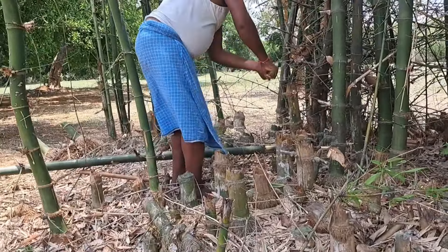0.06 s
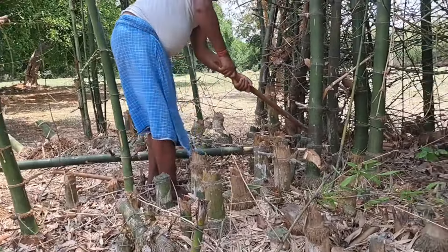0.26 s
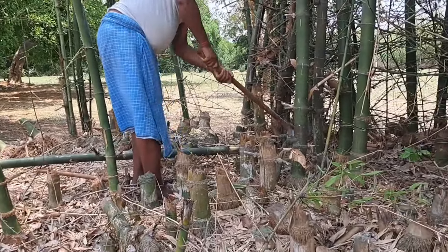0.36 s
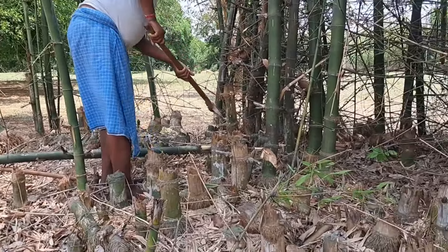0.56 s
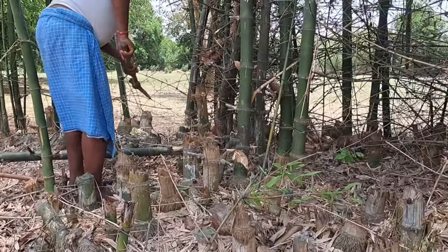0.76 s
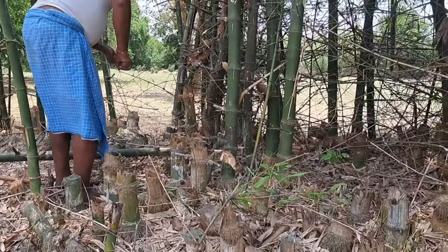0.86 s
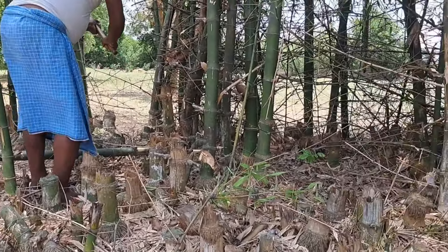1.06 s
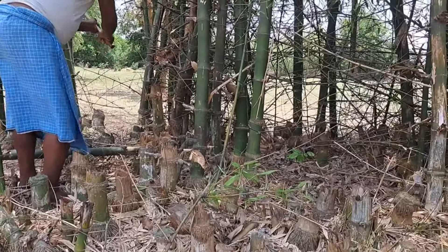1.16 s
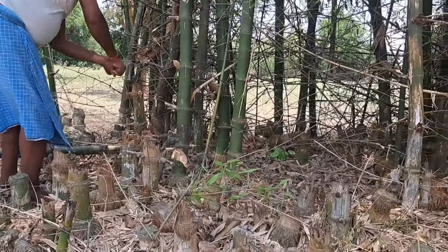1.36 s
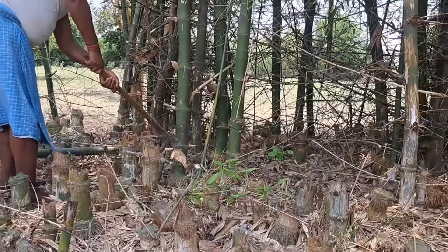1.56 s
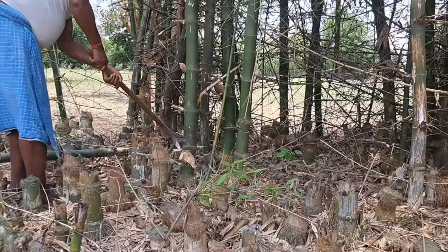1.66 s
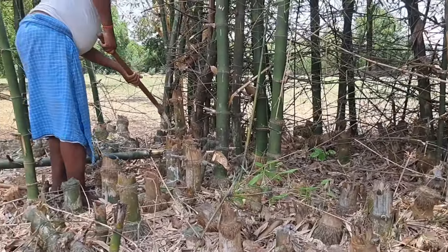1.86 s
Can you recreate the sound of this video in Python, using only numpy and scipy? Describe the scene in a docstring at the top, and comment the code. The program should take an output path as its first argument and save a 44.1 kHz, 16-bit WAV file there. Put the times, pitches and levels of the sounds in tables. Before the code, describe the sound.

A blade chops into green bamboo at about 0.2 seconds, slightly to the right, with a sharp crack, a brief hollow ring and a short outdoor echo. Dry leaves rustle and twigs snap just after. Near 1.4 seconds another swing brushes through twigs, and a second chop lands at 1.5 with a dull thud. Faint insect hiss and low wind continue throughout, with small microphone bumps in the first second.

```python
"""Chopping green bamboo

A long-handled blade chops twice into bamboo in a grove, a few metres right of a hand-held microphone.
Each swing brushes through twigs and fractures fibres with a crack; the impact excites the modes of
the hollow stalk, shakes dry leaves and is scattered back by the grove.
Wind and small bumps touch the microphone; insects hiss far away."""
import sys
import numpy as np
from scipy import signal
from scipy.fft import rfft, irfft
from scipy.io import wavfile
from scipy.ndimage import uniform_filter1d

SR = 44100
rng = np.random.default_rng(int(sys.argv[2]) if len(sys.argv) > 2 else 0)


def transcribe(u):
    """Save the signal u as a 16-bit wav file named by the first command-line argument.

    u: samples, shape (n,) or (channels, n), limited to [-1, 1]; the rate is SR.
    q: integer samples, one column per channel.
    """
    v = np.clip(np.atleast_2d(u).T, -1, 1)
    q = np.round(v * 32767).astype(np.int16)
    wavfile.write(sys.argv[1], SR, q)


N = 83790
T, HZ = np.arange(N) / SR, np.maximum(np.fft.rfftfreq(N, 1 / SR), 1)
T60_PER_DECAY = np.log(1000)  # time constants in a fall of 60 dB


def undb(db):
    """Amplitude ratio of a level in decibels."""
    return 10 ** (np.asarray(db) / 20)


def unit(x):
    """Normalisation to rms 1."""
    return x / np.sqrt(np.mean(x ** 2, axis=-1, keepdims=True))


def across(table, column=1):
    """Interpolation of a table column over log frequency."""
    table = np.array(table, float)
    return np.interp(np.log(HZ), np.log(table[:, 0]), table[:, column])


def hump(hz, octaves):
    """Magnitude response of a broad resonance."""
    return 1 / (1 + (np.log2(HZ / hz) / octaves) ** 2 / 2) ** 2


def patchy(depth_db=3.5, spacing_hz=70):
    """Irregular response of many narrow resonances of stalks and twigs."""
    grid = np.arange(0, SR / 2, spacing_hz)
    return undb(depth_db * np.interp(HZ, grid, rng.standard_normal(len(grid))))


def colour(x, gain):
    """Minimum-phase filtering by way of the folded cepstrum."""
    cepstrum = irfft(np.log(gain + 1e-6), N)
    fold = 1 + np.sign(N / 2 - np.arange(N)) - (T == 0)
    return irfft(rfft(x) * np.exp(rfft(cepstrum * fold)), N)


def noise():
    """Two uncorrelated channels of white noise."""
    return rng.standard_normal((2, N))


def crackle(per_s, spread_db):
    """Shot noise: a Poisson train of tiny fractures of uneven size."""
    size = (rng.random(N) < per_s / SR) * undb(spread_db * rng.exponential(size=N).clip(0, 4))
    power = uniform_filter1d(size ** 2, size=8).clip(0)
    return unit(noise() * np.sqrt(power))


def burst(start, rise_s, decay_s, hold_s=0):
    """Envelope of linear attack, hold and exponential decay."""
    age = T - start
    return np.clip(age / rise_s, 0, 1) * np.exp(-np.maximum(age - rise_s - hold_s, 0) / decay_s)


def at_level(x, envelope):
    """Normalisation to the rms of an envelope."""
    return unit(x) * np.sqrt(np.mean(envelope ** 2))


def excite(source, envelope, gain):
    """Source-filter model: a shaped excitation drives a resonant body."""
    return at_level(colour(source * envelope, gain), envelope)


# stereo image: frequency_hz, left_minus_right_db, coherence
IMAGE = [(100, -4.5, 1), (500, -5, 0.6), (989, -3.5, 0.48), (1670, -5.5, 0.1), (3100, -12, .1),
         (5500, -6.5, .05), (9100, -0.5, 0.11), (15000, -0.5, 0.033)]


def place(pair, left_lead_s=.00007):
    """A level difference puts the source to the right; coherence falls towards the treble."""
    pan_db = across(IMAGE)
    angle = np.arccos(across(IMAGE, column=2).clip(-1, 1))
    right, diffuse = rfft(pair)
    left = (right * np.cos(angle) + diffuse * np.sin(angle)) * np.exp(2j * np.pi * HZ * left_lead_s)
    return irfft(np.array([left * undb(pan_db / 2), right * undb(-pan_db / 2)]), N)


# spectrum of distant insects and leaves: frequency_hz, gain_db
INSECT_SPECTRUM = [(100, 5.5), (200, -5.5), (320, -6.5), (600, -20.5), (1100, -15), (1650, -19.5),
                   (2200, -11), (3130, -8.5), (4120, -15.5), (4950, -4), (5940, -8.5), (8270, -28.5),
                   (11700, -21.5), (16000, -30)]


def insects(level_db=-52):
    """Many distant sources sum incoherently to a gently swelling hiss."""
    swell_db = .7 * unit(colour(noise()[0], hump(4, 1)))
    return undb(level_db + swell_db) * unit(colour(noise(), undb(across(INSECT_SPECTRUM))))


# wind strength at the microphone: time_s, level_db
WIND_LEVELS = [(0, -46), (.4, -53), (.55, -52.5), (.7, -50.5), (.81, -60.5), (1.0, -45.5), (1.22, -43.5),
               (1.33, -49.5), (1.42, -43), (1.5, -39.5), (1.7, -47), (1.9, -48.5)]


def wind():
    """Turbulent pressure makes a gusty rumble, uncorrelated at the two ports."""
    gust_db = 3 * unit(colour(noise(), hump(18, .98)))
    rumble = unit(colour(noise(), hump(66, 1.66) ** 4))
    level_db = np.interp(T, *np.array(WIND_LEVELS).T)
    return rumble * undb(level_db + gust_db) * undb([[1.5], [-1.5]])


# touches on the microphone: start_s, level_db, pitch_hz, decay_s, tick_relative_db
MIC_BUMPS = [(0.0095, -19.5, 232, 0.0027, -20), (0.033, -29, 290, 0.00093, -19),
             (0.054, -16, 143, 0.0061, -21), (0.099, -22, 163, 0.0014, -15),
             (0.158, -34.5, 175, 0.013, -20), (0.5335, -9, 316, 0.00038, -9),
             (0.9731, -26, 200, 0.00055, -2), (0.997, -27, 198, 0.0011, -2.5),
             (1.0438, -25, 290, 0.0037, -2), (1.05, -28, 111.3, 0.026, -4.5)]


def bumps(rise_cycles=.55):
    """Contact noise: damped knocks with a small tick, almost only at the right port."""
    knocks, ticks = 0, 0
    for start, db, hz, decay, tick_db in MIC_BUMPS:
        knocks -= undb(db) * np.sin(2 * np.pi * hz * (T - start)) * burst(start, rise_cycles / hz, decay)
        tick = excite(noise()[0], burst(start, .000095, .00035), hump(850, 2.3) ** 4)
        ticks += undb(db + tick_db) * tick
    return (colour(knocks, hump(200, 1.3)) + ticks) * undb([[-24], [0]])


# spectrum of dry leaves and twigs: frequency_hz, gain_db
LEAF_SPECTRUM = [(100, -8), (500, -9), (1200, -8.5), (1900, -4), (3100, 3.5), (4200, -4.5), (6300, 1.5),
                 (8500, -14), (10000, -14.5), (12000, -11)]


def rustle(envelope, per_s, spread_db, tilt_db=0):
    """Dense random impulses excite the resonances of dry foliage."""
    gain = undb(across(LEAF_SPECTRUM) + tilt_db * np.log2(HZ / HZ[-1]))
    return excite(crackle(per_s, spread_db), envelope, gain * patchy())


# brushes against twigs: start_s, level_db, rise_s, decay_s, tilt_db_per_octave
TWIG_BRUSHES = [(0.143, -30.5, 0.0094, 0.023, 1), (0.176, -35.5, 0.0025, 0.026, -1),
                (0.207, -38.5, 0.019, 0.06, -3.5), (0.301, -26.5, 0.0049, 0.011, 3.5),
                (0.329, -34, 0.0022, 0.015, 2.5), (0.431, -38.5, 0.0029, 0.017, 1),
                (0.554, -43.5, 0.015, 0.032, -2), (0.724, -44, 0.012, 0.046, 0),
                (1.439, -20.5, 0.004, 0.012, 9), (1.563, -27, 0.0024, 0.026, 4)]
# twig snaps, and near 1 s a tick and a short scrape from touches on the microphone:
# start_s, level_db, centre_hz, width_octaves, decay_s
CLICKS = [(0.2998, -32, 5740, 0.36, .004), (0.3084, -24, 3100, 0.28, 0.0041),
          (0.3871, -24.5, 4520, 0.4, 0.0064), (0.7313, -34.5, 3100, 0.22, 0.0039),
          (0.847, -46.5, 3300, 0.18, 0.0059), (0.974, -25.5, 3270, 0.56, 0.00029),
          (1.0435, -40, 1720, 1.0, 0.0025), (1.441, -38.5, 1250, 0.069, 0.011)]
# blade passing through foliage: peak_s, level_db, rise_s, fall_s, centre_hz, width_octaves
BLADE_SWEEPS = [(1.481, -42.5, 0.076, 0.23, 3150, 0.31), (1.483, -44, 0.046, 0.17, 1600, 2.46),
                (1.505, -49.5, 0.068, 0.018, 448, 0.8)]


def foliage_and_clicks():
    """Friction and fracture: foliage is brushed, snapped and swept; microphone touches tick and scrape."""
    out = 0
    for start, db, rise, decay, tilt_db in TWIG_BRUSHES:
        out += undb(db) * rustle(burst(start, rise, decay), per_s=7000, spread_db=2.4, tilt_db=tilt_db)
    for start, db, hz, width, decay in CLICKS:
        out += undb(db) * excite(noise(), burst(start, .00028, decay), hump(hz, width) * patchy())
    for peak, db, rise, fall, hz, width in BLADE_SWEEPS:
        swell = np.exp(-((T - peak) / np.where(T < peak, rise, fall)) ** 2 / 2)
        out += undb(db) * excite(crackle(per_s=4000, spread_db=.92), swell, hump(hz, width))
    return out


def far_echo(start):
    """Diffuse reflection from distant trees builds up late."""
    return excite(noise(), burst(start, rise_s=.078, decay_s=.13), hump(1000, 1.49) ** 2 * patchy())


# reverberation of the grove: frequency_hz, gain_db, t60_s
GROVE_BANDS = [(108, 0, 0.27), (246, 2, 0.54), (500, 7.5, 0.26), (1110, 6, 0.34), (1850, 0, 0.51),
               (3100, -8, 0.65), (6900, -13, 0.93), (8600, -25, 0.71), (15800, -21.5, 0.83)]


def grove_echo(start):
    """Multiple scattering among stalks leaves a noise tail; the treble lingers longest."""
    spectrum = rfft(unit(colour(noise(), undb(across(GROVE_BANDS)) * patchy())))
    out = 0
    for centre, _, t60 in GROVE_BANDS:
        band = across([(hz, hz == centre) for hz, *_ in GROVE_BANDS])
        out += irfft(spectrum * band, N) * burst(start, .013, t60 / T60_PER_DECAY)
    return out


# thuds of the shaken clump: start_s, level_db, hold_s, decay_s
CLUMP_THUDS = [(0.244, -31, 0.029, 0.019), (1.542, -21.5, 0.0041, 0.01), (1.601, -31, .04, .01)]


def thuds():
    """Heavily damped vibration of the clump and the ground gives dull rumbles."""
    out = 0
    for start, db, hold, decay in CLUMP_THUDS:
        envelope = burst(start, .007, decay, hold)
        rumble = colour(noise(), hump(78, 1.05) ** 2)
        out += undb(db) * at_level(rumble * envelope, envelope)
    return out


# modes of the hard stalk wall: pitch_hz, t60_s, first_chop_db, second_chop_db
WALL_MODES = [(1620, .024, -13, -26), (2456, .028, -7.5, -24), (3245, .028, -16, -18),
              (3700, .024, -13, -26), (6030, .03, -21, -21)]


def wall_ring(start, chop):
    """Impulse response: the landing edge sets the wall into brief free vibration."""
    out = 0
    for hz, t60, *levels_db in WALL_MODES:
        envelope = burst(start, .0005, t60 / T60_PER_DECAY)
        out += undb(levels_db[chop]) * envelope * np.sin(2 * np.pi * hz * (T - start))
    return np.sqrt(2) * out


# modes of the hollow stalk: pitch_hz, t60_s, swell_s, first_chop_db, second_chop_db
STALK_MODES = [(153, .3, .012, -35, -33), (246, .16, .012, -26.5, -31), (293, .3, .025, -32, -30),
               (402, .13, .026, -27, -34), (457, .11, .024, -26, -29), (546, .18, .028, -22, -35),
               (572, .18, .031, -29, -24), (725, .11, .027, -24, -33), (797, .11, .004, -29, -39),
               (920, .08, .018, -27, -42), (976, .09, .004, -26, -34), (1045, .11, .017, -22, -39),
               (1088, .14, .018, -25, -28.5), (1290, .14, .008, -35, -33), (3250, .22, .012, -39, -37)]


def stalk_ring(start, chop, wobble_rad=.62):
    """Normal modes build up while the blade wedges in, then decay with wavering phase."""
    knots_s = np.arange(0, 2, .012)
    out = 0
    for hz, t60, swell, *levels_db in STALK_MODES:
        wobble = np.interp(T, knots_s, rng.standard_normal(len(knots_s)))
        phase = 2 * np.pi * (hz * (T - start) + rng.random()) + wobble_rad * wobble
        envelope = burst(start, swell, t60 / T60_PER_DECAY, hold_s=.007)
        out += undb(levels_db[chop]) * envelope * np.sin(phase)
    return np.sqrt(2) * out * undb([[-.25], [.25]])


# spectra of splitting fibres, one list per chop: frequency_hz, gain_db
CRACK_SPECTRA = [
    [(50, -9.5), (120, -1), (260, 7), (535, -0.5), (1030, 5), (1250, 0.5), (1700, 1), (1950, -15.5),
     (2470, 0), (2900, -4.5), (3650, -4.5), (4700, -4), (6150, -7.5), (10000, -44), (16000, -50)],
    [(50, -12), (100, -5.5), (300, -10), (520, -6), (750, -17), (1310, -8), (2100, -13.5), (2620, -8.5),
     (3350, -10), (5080, -9), (6560, -8), (9000, -37), (12700, -21.5), (16000, -47)],
]


def crack(start, cut_s, chop, edge_db=-13.5):
    """Impact and fracture: the edge lands as one impulse, then fibres part in quick succession."""
    envelope = burst(start, .00027, .0035, hold_s=cut_s)
    edge = np.diff(burst(start, 1 / SR, .91), prepend=0).clip(0)
    fibres = crackle(per_s=13000, spread_db=2.3) * envelope
    force = unit(fibres) + undb(edge_db) * unit(edge)
    return at_level(colour(force, undb(across(CRACK_SPECTRA[chop]))), envelope)


# blows of the blade: start_s, crack_db, cut_s, stalk_gain_db, leaves_db, echo_db
BLOWS = [(.2354, -8, 0.0043, -1.5, -29, -23.5), (1.535, -11.5, 0.0073, -4.5, -24, -24)]


def chops(far_db=-46.5):
    """Each blow's energy divides among fracture, ringing and shaken foliage; the grove reflects it."""
    scatter, ring = 0, 0
    for chop, (start, crack_db, cut_s, stalk_db, leaves_db, echo_db) in enumerate(BLOWS):
        scatter += undb(leaves_db) * rustle(burst(start, .025, .066), per_s=5000, spread_db=3.1)
        scatter += undb(far_db) * far_echo(start)
        scatter += undb(crack_db) * crack(start, cut_s, chop) + wall_ring(start, chop)
        scatter += undb(echo_db) * grove_echo(start)
        ring += undb(stalk_db) * stalk_ring(start, chop)
    return place(scatter + thuds()) + ring


def scene():
    """Superposition of the grove's sounds and the disturbances at the microphone."""
    return place(insects()) + chops() + place(foliage_and_clicks()) + bumps() + wind()


def record(dry, drive=1.1, bottom_hz=36, top_hz=15900):
    """Soft saturation rounds the loudest peaks; band limiting cuts the lowest bass and the top."""
    rounded = np.tanh(drive * dry) / drive
    highpass = signal.butter(3, bottom_hz, "high", fs=SR, output="sos")
    lowpass = signal.ellip(8, .2, 70, top_hz, fs=SR, output="sos")
    return signal.sosfilt(lowpass, signal.sosfilt(highpass, rounded))


dry = scene()
out = record(dry)
transcribe(out)
```